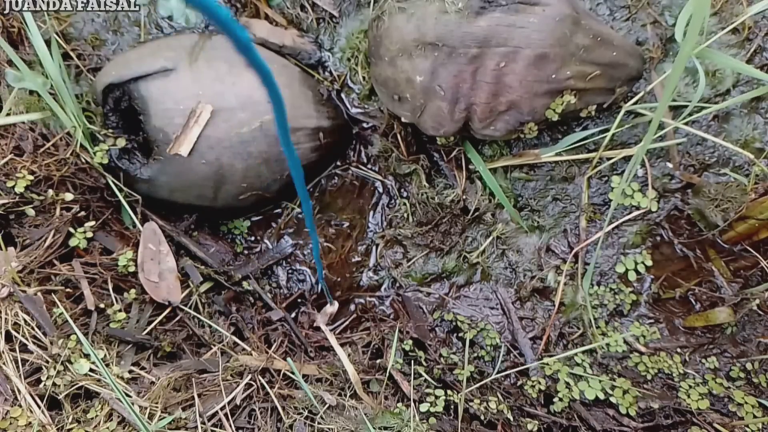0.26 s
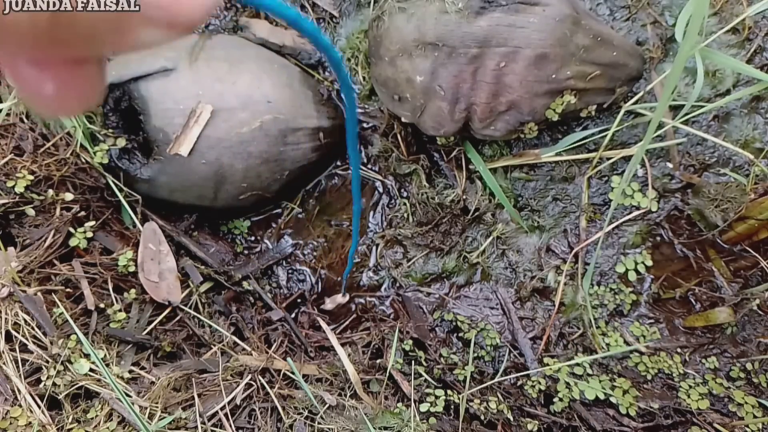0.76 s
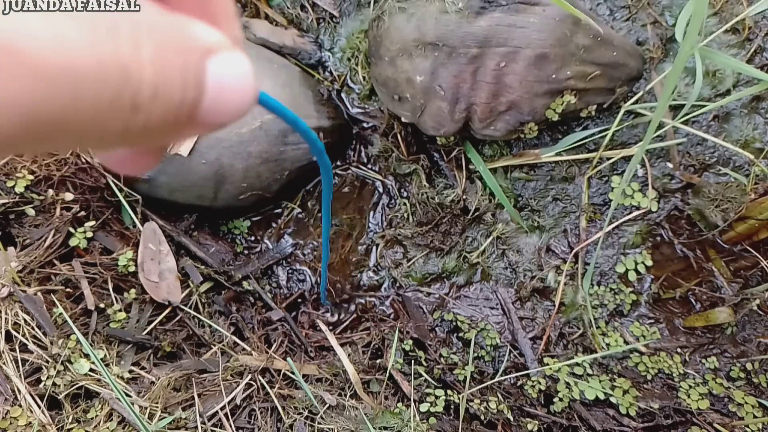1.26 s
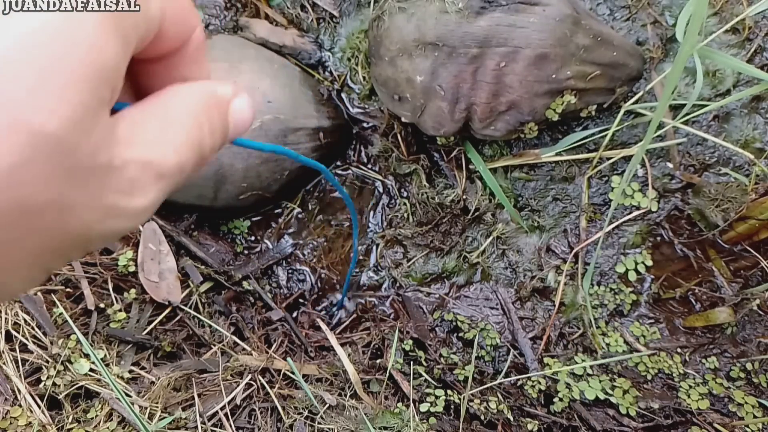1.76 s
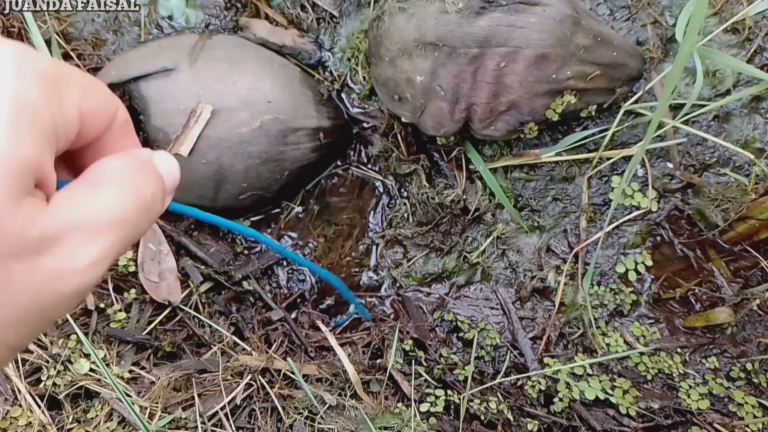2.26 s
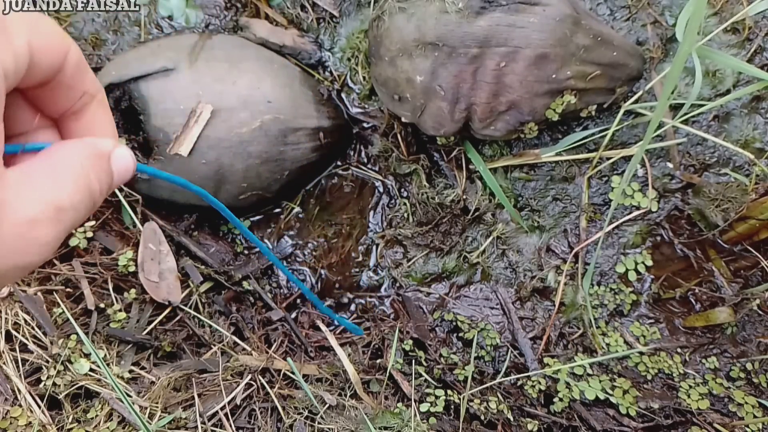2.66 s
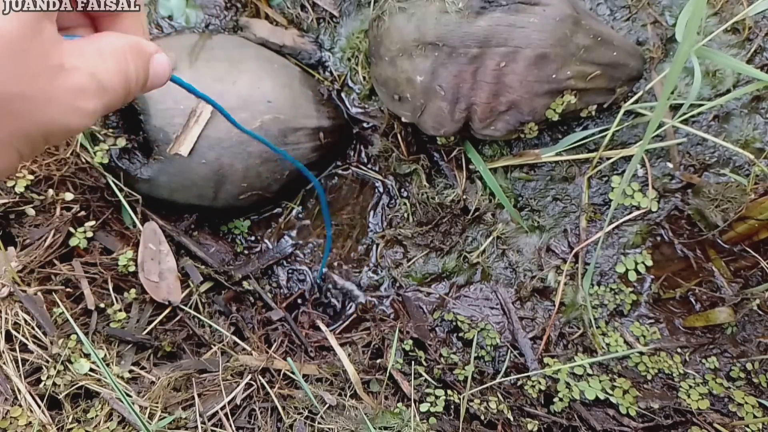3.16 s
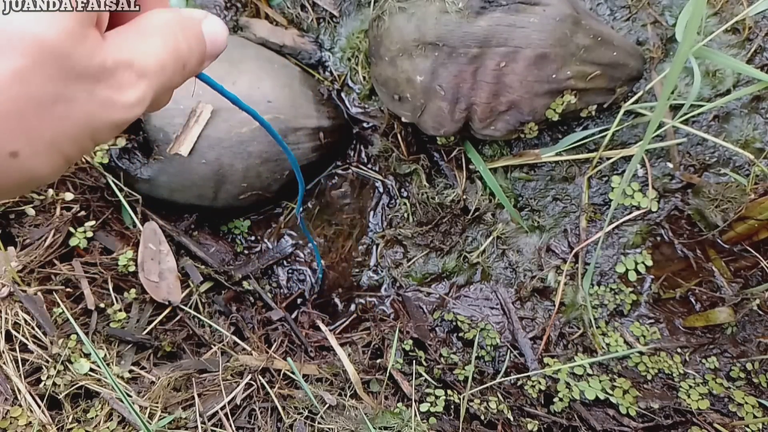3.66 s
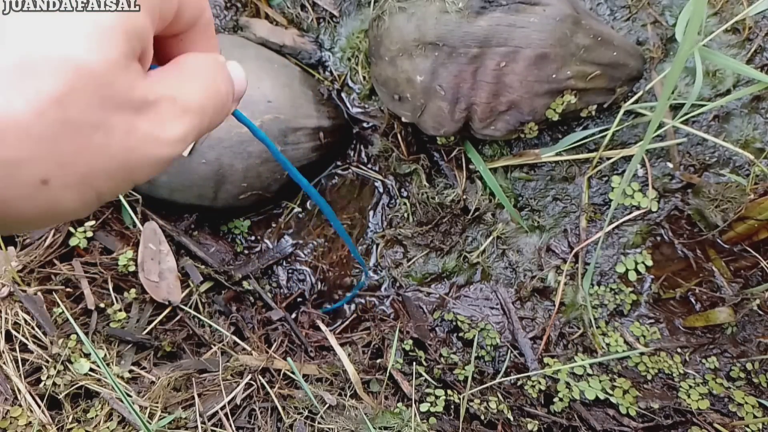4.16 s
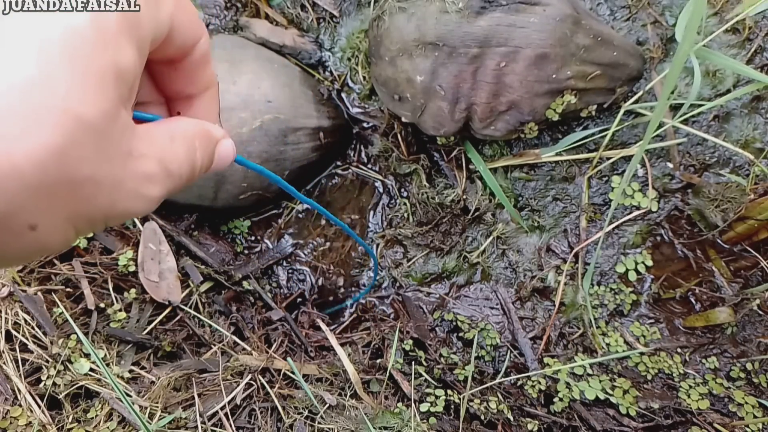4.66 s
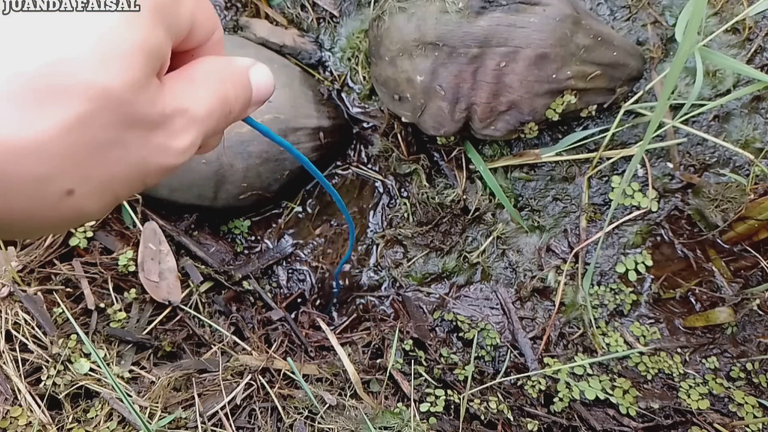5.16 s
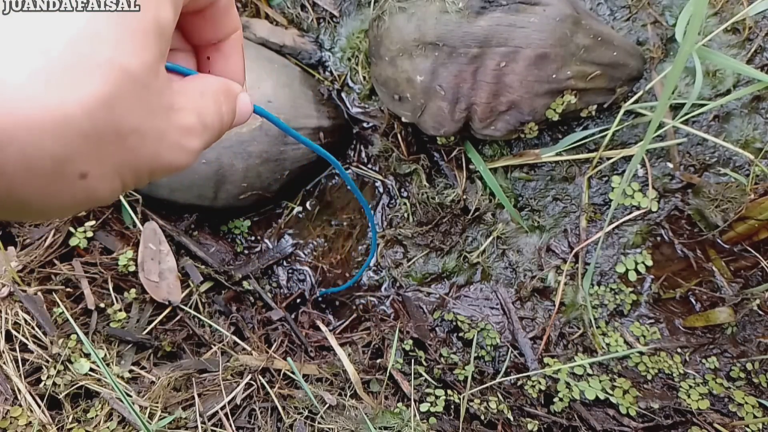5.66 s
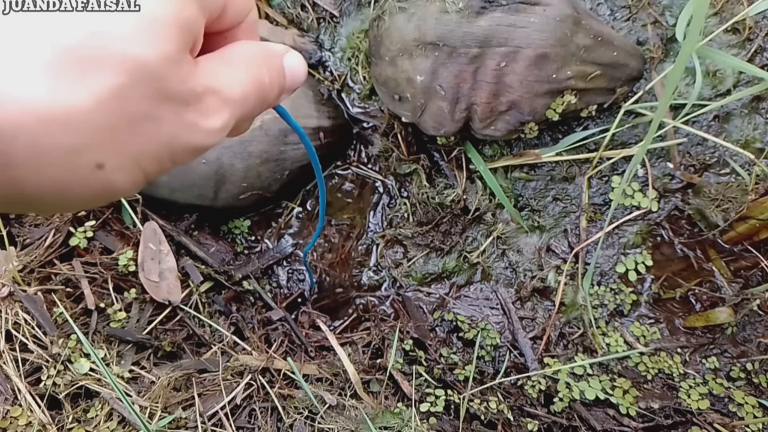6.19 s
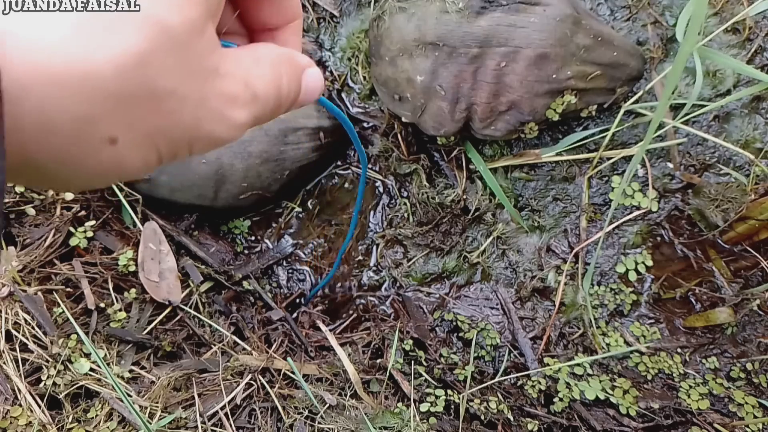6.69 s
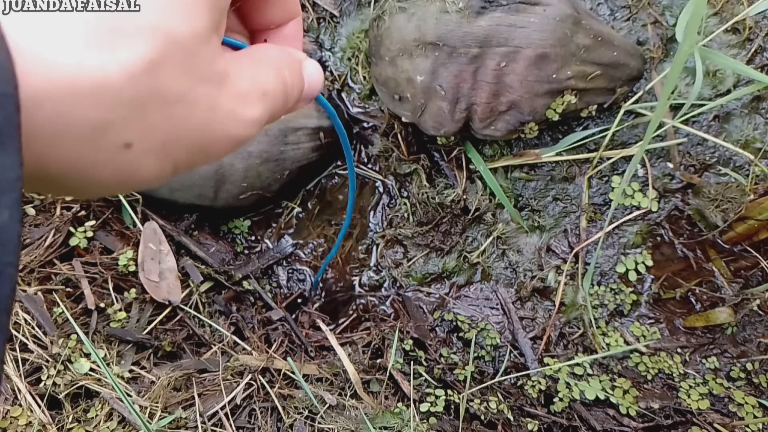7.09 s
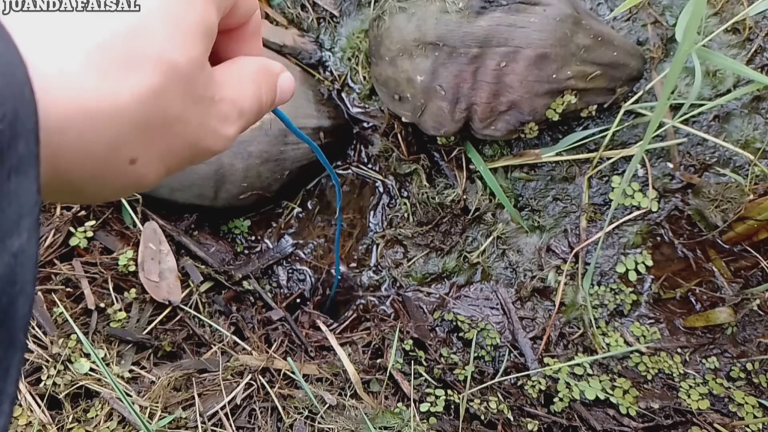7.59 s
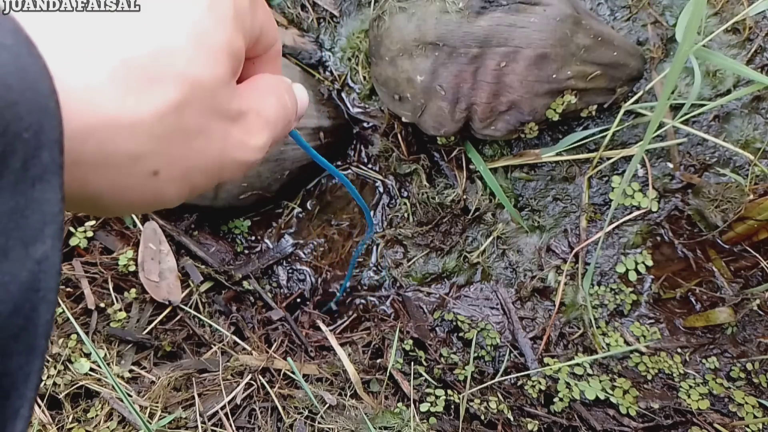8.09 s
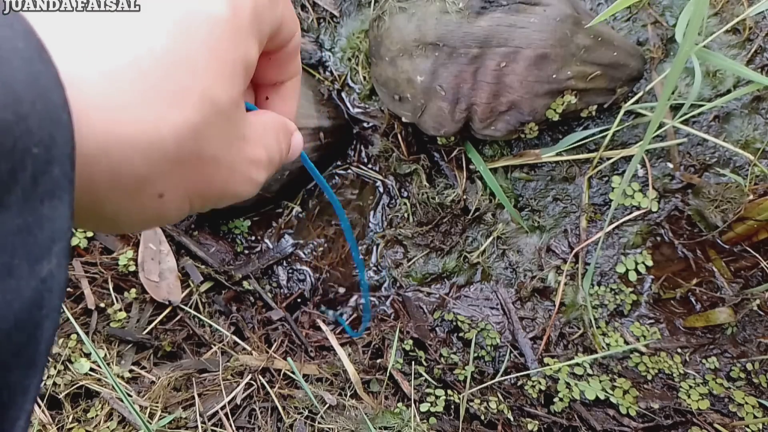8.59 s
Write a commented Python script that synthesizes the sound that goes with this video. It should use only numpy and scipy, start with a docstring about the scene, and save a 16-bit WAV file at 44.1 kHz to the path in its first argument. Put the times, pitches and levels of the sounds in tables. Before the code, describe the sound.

After a tiny silence of 0.1 s, a wide steady outdoor hiss starts, like distant water and leaves, and continues to the end near 8.8 s. It swells slightly around 1.7-3.3 s and near 5.9 s, then eases off. One thin cricket at about 9.2 kHz chirps quickly throughout, roughly ten short buzzing chirps a second; a second, near 9.6 kHz, joins at the very start, from 2.3 to 5.8 s, and more faintly from 7.4 s. Faint wet ticks patter close by, with clearer ones near 1, 1.3, 3, 6 and 7-7.7 s. Small dry rustles brush at 0.9, 1.4-1.7, 3 and 7-7.6 s. Low lumpy wind rumbles quietly beneath. Soft, deep microphone bumps come at 4.4 s, the strongest, and 6.5 s, with a duller knock; others are barely noticeable.

```python
"""A damp open field: a broad steady hiss of far water and leaves, random spectra with slow swells.
Two crickets chirp near 9.2 and 9.6 kHz, each wing stroke a short falling tone.
Lumpy wind is low noise with gusts; soft wind bumps at the microphone are a low push and a higher thud.
Faint wet ticks (decaying sines with splatter) and dry rustles (bright noise bursts) sound close by."""
import sys
import numpy as np
from scipy import signal
from scipy.fft import rfft, irfft
from scipy.io import wavfile
from scipy.ndimage import uniform_filter1d

SR = 44100
rng = np.random.default_rng(int(sys.argv[2]) if len(sys.argv) > 2 else 0)


def dump(signal):
    """Clip the signal to [-1, 1] and save it as 16-bit WAV at the path in sys.argv[1]."""
    limited = np.clip(np.atleast_2d(signal).T, -1, 1)
    pcm = np.round(limited * 32767).astype(np.int16)
    wavfile.write(sys.argv[1], SR, pcm)


def volts_from_decibels(level):
    """Turn decibel levels (scalar or array-like) into linear amplitude factors."""
    exponent = np.asarray(level, float) / 20
    return 10 ** exponent


N = 389844


def evened(x):
    """Scales to rms 1."""
    return x / np.sqrt(np.mean(x ** 2) + 1e-20)


def read(points, hz):
    """Reads a spectrum on a log-frequency axis."""
    f, value = np.transpose(points)
    return np.interp(np.log(hz + 1), np.log(f + 1), value)


def add(mix, s, sound):
    """Adds a sound at a time."""
    part = mix[round(s * SR):][:len(sound)]
    part += sound[:len(part)]


def noise(colour, size, patch_db, flicker_db, lift_db=0):
    """Random short-time spectra with drifting patches and a flicker shared by all bands; rms 1."""
    frames, hz = 4 * N // size + 5, np.fft.rfftfreq(size, 1 / SR)
    real, imag, patches = rng.standard_normal((frames, len(hz), 3)).T
    patches = uniform_filter1d(patches, size=8, axis=0)
    patches = evened(uniform_filter1d(patches, size=12, axis=1))
    flicker = evened(uniform_filter1d(rng.standard_normal(frames), size=3))
    field_db = read(colour, hz)[:, None] + patch_db * patches + flicker_db * flicker + lift_db
    spectra = (real + 1j * imag) * volts_from_decibels(field_db)
    return evened(signal.istft(spectra, nperseg=size, noverlap=size * 3 // 4)[1][:N])


# hiss spectrum: (frequency [Hz], relative density [dB per Hz])
HISS_COLOUR = [(120, -22.5), (200, -7), (330, -0.5), (500, -3), (1200, -3), (1700, -1), (3000, -1),
               (3700, -2), (4650, -6), (4900, -7.5), (7600, -19.5), (8500, -15), (10500, -17),
               (12700, -32.5), (15500, -22)]
# hiss swell, before the fixed gain: (time [s], level [dB])
HISS_SWELL = [(.12, -38.5), (.6, -38), (1.2, -38), (1.75, -36.5), (2, -38), (2.3, -36.5), (2.7, -37),
              (2.97, -37.5), (3.23, -36.5), (3.4, -39), (4.6, -38.3), (5.7, -38), (5.9, -36.8),
              (6.3, -37.5), (7, -37.6), (7.4, -38), (8, -38.5), (8.84, -39.5)]
TREBLE_LIFT_DB, TREBLE_DB_PER_SWELL_DB = -0.5, 0.7


def hiss():
    """Wide wash; its bass follows the swells only in part, above 6 kHz it swells progressively more."""
    s, level_db = np.transpose(HISS_SWELL)
    hz = np.fft.rfftfreq(1024, 1 / SR)[:, None]
    t = np.arange(4 * N // 1024 + 5) * 256 / SR
    follows = np.clip(0.13 + hz / 2500, 0, 1)
    treble = np.clip(hz / 4000 - 1.5, 0, 1)
    swell_db = np.interp(t, s, level_db - level_db.mean())
    lift_db = follows * swell_db + treble * (TREBLE_LIFT_DB + TREBLE_DB_PER_SWELL_DB * swell_db)
    wash = noise(HISS_COLOUR, size=1024, patch_db=0.73, flicker_db=0.77, lift_db=lift_db)
    return volts_from_decibels(level_db.mean() + 0.8) * wash


# wind on the microphone, before the fixed gain: (time [s], level [dB])
WIND_GUSTS = [(.12, -53), (.3, -56), (.73, -60), (1, -57), (1.7, -61), (2.3, -60), (2.65, -55), (2.95, -57),
              (3.2, -52), (3.4, -58), (4.2, -60.5), (4.5, -56), (5.05, -62), (5.7, -62), (6.3, -58),
              (6.6, -55), (6.9, -63), (7.3, -60), (7.7, -59), (8.84, -60)]
# wind spectrum: (frequency [Hz], relative density [dB])
WIND_SPECTRUM = [(18, -40), (30, -27), (42, -4), (60, -2), (85, -1), (128, -3.5), (170, -20), (300, -54)]
GUST_DEEP_HZ = 95  # gusts act fully below, about half as much an octave above


def wind():
    """Lumpy low turbulence; gusts are felt most in the deep bass."""
    s, level_db = np.transpose(WIND_GUSTS)
    hz = np.fft.rfftfreq(4096, 1 / SR)[:, None]
    t = np.arange(4 * N // 4096 + 5) * 1024 / SR
    gust_db = np.interp(t, s, level_db - level_db.mean()) * np.minimum(1, GUST_DEEP_HZ / (hz + 1))
    rumble = noise(WIND_SPECTRUM, size=4096, patch_db=0.1, flicker_db=1.0, lift_db=gust_db)
    return volts_from_decibels(level_db.mean() - 0.65) * rumble


# small wet ticks: (time [s], level of the sine before its envelope [dB], pitch [Hz])
CLEAR_TICKS = [(0.972, -24, 3620), (1.245, -27, 1690), (1.3354, -24.5, 3420), (1.6836, -28, 2590),
               (1.7177, -26.5, 2480), (2.5885, -28, 2570), (2.895, -25.5, 2990), (2.96, -26, 2880),
               (3.1063, -27, 1630), (3.208, -25, 2640), (5.0804, -29, 2650), (6.035, -23.5, 1790),
               (6.1594, -25, 2450), (7.006, -26, 2410), (7.0589, -29, 1610), (7.239, -26, 2520),
               (7.5193, -26, 2530), (7.677, -29, 4500)]
TICK_T60_S, DROP_T60_S, DROPS_PER_S = 0.024, 0.0082, 30  # drops: mean rate per pitch at mean swell


def ticks():
    """A few cycles with a wet splatter; the clearest are listed, fainter ones fall at random."""
    out, t = np.zeros(N), np.arange(900) / SR
    wet = signal.butter(2, [1400, 4500], "band", fs=SR)
    for (s, db, hz), spray in zip(CLEAR_TICKS, rng.standard_normal((len(CLEAR_TICKS), len(t)))):
        splatter = evened(signal.lfilter(*wet, spray))
        envelope = volts_from_decibels(db - 60 * t / TICK_T60_S) * np.minimum(t / 0.0019, 1)
        add(out, s, envelope * (np.sin(2 * np.pi * hz * t) + 0.73 * splatter))
    s, swell_db = np.transpose(HISS_SWELL)
    busy = volts_from_decibels(3 * (np.interp(np.arange(N) / SR, s, swell_db) - swell_db.mean()))  # more in the swells
    drop_envelope = volts_from_decibels(-60 * t / DROP_T60_S) * np.minimum(t / 0.0012, 1)
    for hz in np.geomspace(1200, 4500, num=8):
        falls = rng.random(N) < DROPS_PER_S * busy / SR
        drops = falls * volts_from_decibels(-42.5 + 3.9 * np.minimum(rng.exponential(1, N), 4))
        out += signal.oaconvolve(drops, drop_envelope * np.sin(2 * np.pi * hz * t))[:N]
    return out


CHIRPS_PER_ROW = 4
SLIP_S, UNEVEN_DB, UNEVEN_SHARE = .0015, .5, .03  # chirp-to-chirp scatter: start, level, sung share
DRIFT_HZ = 22  # chirp-to-chirp scatter in pitch


def fill_chirps(bouts):
    """Fills in evenly spaced chirps between rows: (start [s], length [s], level [dB])."""
    out = []
    for rows in bouts:
        place = np.arange((len(rows) - 1) * CHIRPS_PER_ROW + 1) / CHIRPS_PER_ROW
        s, db, share = (np.interp(place, np.arange(len(rows)), column) for column in np.transpose(rows))
        slip, loud, long = rng.standard_normal((len(s), 3)).T
        length = np.gradient(s) * np.clip(share + UNEVEN_SHARE * long, .3, 1.1)
        out += zip(s + SLIP_S * slip, length, db + UNEVEN_DB * loud)
    return [chirp for chirp in out if 0 <= chirp[0] < N / SR]


def cricket(chirps, pitch_curve, strokes_per_s, fall_hz, rise_hz, swell_db, wing_hz):
    """Each wing stroke is a short tone falling in pitch, loudest near the wing resonance."""
    out, lag = np.zeros(N), np.arange(4000) / SR
    # diffuse echoes, perhaps off grass, drawn at random for each chirp
    diffuse = rng.standard_normal((len(chirps), len(lag))) * volts_from_decibels(-60 * lag / 0.24)
    for (s, length, db), chance, echoes in zip(chirps, rng.standard_normal((len(chirps), 24)), diffuse):
        t = np.arange(round(length * SR)) / SR
        turns, along = t * strokes_per_s * (1 + 0.018 * chance[-1]), t / length
        stroke, uneven = turns % 1, chance[turns.astype(int) % 22]
        # strokes widen in pitch, rise and grow through a chirp
        fall = fall_hz * (0.94 + 0.75 * along) * (1 - 2 * stroke)
        off_hz = rise_hz * (along - .5) + fall + 40 * uneven
        pitch_hz = np.interp(s, *np.transpose(pitch_curve)) + DRIFT_HZ * chance[-2] + off_hz
        resonance = np.exp(-(off_hz / wing_hz) ** 2)
        closing = np.sin(np.pi * np.clip(stroke / 0.92, 0, 1)) * resonance
        carrier = np.sin(2 * np.pi * np.cumsum(pitch_hz) / SR)
        tone = carrier * closing * volts_from_decibels(swell_db * along + 1.3 * uneven)
        chirp = volts_from_decibels(db) * evened(tone) * signal.windows.tukey(len(t), .1)
        add(out, s, chirp)
        add(out, s, volts_from_decibels(-6) * signal.fftconvolve(chirp, echoes / np.linalg.norm(echoes)))
    return out


# every fourth chirp, one list per bout: (time [s], level [dB], sung share of the period [1])
LOW_BOUTS = [
    [(.059, -42.5, 0.68), (.449, -47, 0.81), (.836, -42, 0.79), (1.232, -43.3, 0.77), (1.63, -42.5, 0.84),
     (2.025, -40, 0.79), (2.442, -43, 0.68), (2.865, -45.5, 0.91), (3.298, -43.5, 0.85), (3.707, -44, 1),
     (4.122, -42, .75), (4.535, -43, 0.78), (4.955, -44.5, 0.78), (5.38, -44.5, 0.83), (5.812, -42.5, 0.77),
     (6.245, -42, 0.81), (6.685, -41, 0.72), (7.099, -47.5, 0.8), (7.483, -46.5, 0.74),
     (7.855, -45.5, 0.95), (8.24, -43.5, 0.79), (8.636, -47, .85), (9.01, -46, .8)],
]
# centre pitch before scatter: (time [s], pitch [Hz])
LOW_PITCH_CURVE = [(0, 9280), (1, 9210), (2.099, 9350), (3, 9230), (4, 9210), (5, 9100), (6.3, 9335),
                   (7.2, 9200), (8.84, 9160)]


def low_cricket():
    """Lower singer: broad wing resonance, deep fall in each stroke."""
    return cricket(fill_chirps(LOW_BOUTS), LOW_PITCH_CURVE, strokes_per_s=140, fall_hz=460,
                   rise_hz=141, swell_db=3.3, wing_hz=1700)


# every fourth chirp, one list per bout: (time [s], level [dB], sung share of the period [1])
HIGH_BOUTS = [
    [(-.298, -42, 0.91), (.142, -40.5, 0.53)],
    [(2.23, -60, 0.65), (2.655, -44.5, 0.73), (3.082, -47.5, 0.94), (3.53, -42.5, 0.73),
     (3.958, -40.5, .74), (4.395, -39, 0.75), (4.845, -38.5, 0.75), (5.275, -39, 0.79), (5.75, -41, .8)],
    [(7.42, -53, 0.87), (7.862, -48, .85), (8.33, -47.5, .78), (8.765, -44.5, 0.69)],
]
# centre pitch before scatter: (time [s], pitch [Hz])
HIGH_PITCH_CURVE = [(0, 9600), (2.4, 9590), (4, 9630), (5.9, 9570), (7.4, 9630), (8.84, 9580)]


def high_cricket():
    """Higher singer: narrower wing resonance, shallower fall, stronger swell."""
    return cricket(fill_chirps(HIGH_BOUTS), HIGH_PITCH_CURVE, strokes_per_s=141, fall_hz=325,
                   rise_hz=42, swell_db=5.3, wing_hz=520)


# dry rustles: (time [s], level before the high-pass [dB], t60 [s])
RUSTLE_BURSTS = [(.255, -52, .04), (.922, -51, .04), (.939, -44, .07), (1.417, -52, .08), (1.549, -51, .08),
                 (1.737, -51, .06), (2.965, -50, .2), (6.971, -49, .08), (7.05, -53, .15),
                 (7.558, -44, .03)]


def rustles():
    """Short decaying bursts of bright noise."""
    out, t = np.zeros(N), np.arange(SR // 4) / SR
    bright = signal.butter(1, 5000, "high", fs=SR, output="sos")
    for (s, db, t60), grit in zip(RUSTLE_BURSTS, rng.standard_normal((len(RUSTLE_BURSTS), len(t)))):
        burst = volts_from_decibels(db - 60 * t / t60) * np.minimum(t / .002, 1)
        add(out, s, burst * signal.sosfilt(bright, grit))
    return out


# soft wind bumps at the microphone:
# (centre time [s], push level [dB], push pitch [Hz], push length scale [s], thud level re push [dB])
WIND_BUMPS = [(.28, -46, 71, .04, -20), (0.611, -46, 85, .03, -11), (1.021, -40, 80, 0.026, -10),
              (2.97, -42, 75.8, 0.08, -22), (3.07, -42, 65, .04, -17), (3.635, -38, 90, 0.019, -20),
              (4.418, -23.5, 80, 0.035, -16), (4.474, -37, 90, 0.021, -20), (4.556, -42, 80, 0.055, -18),
              (6.499, -27.5, 80, 0.02, -7.5), (6.533, -39, 90, .03, -14), (6.565, -38, 85, .04, -1),
              (6.733, -46, 80, .06, -20), (8.714, -45, 70, 0.05, -18)]
THUD_HZ = 256


def wind_bumps():
    """A low push of one to a few cycles, swelling and dying away, and a shorter, higher thud."""
    out, t = np.zeros(N), np.arange(-SR // 10, SR // 10) / SR
    for s, db, hz, length, thud_db in WIND_BUMPS:
        push = np.cos(2 * np.pi * hz * t + 0.53) * (1 + (3 * t / length) ** 2) ** -1.8
        thud = volts_from_decibels(thud_db) * -np.cos(2 * np.pi * THUD_HZ * t) * np.exp(-(t / 0.0062) ** 2)
        add(out, s + t[0], volts_from_decibels(db) * (push + thud))
    return out


def scene():
    """Everything at one microphone."""
    insects = low_cricket() + high_cricket()
    return (hiss() + wind() + ticks() + insects + rustles() + wind_bumps())[None]


def band_limit(x):
    """A steep low-pass at the top of the band."""
    return signal.sosfilt(signal.butter(12, 16650, fs=SR, output="sos"), x)


NOTCH_HZ, NOTCH_WIDTH_HZ, NOTCH_DB = 166, 19.5, -12
BASS_CUT_HZ, EDGE_HZ = 27.6, 15510  # -6 dB point; nothing above the edge
START_S = .1075


def record(dry):
    """A narrow dip where the bass and main paths cross, band limits, a short silence at first."""
    hz = np.fft.rfftfreq(N, 1 / SR)
    dip = volts_from_decibels(NOTCH_DB * np.exp(-((hz - NOTCH_HZ) / NOTCH_WIDTH_HZ) ** 2))
    bass_cut = 1 / (1 + (BASS_CUT_HZ / (hz + 1)) ** 4)
    treble_edge = np.clip((EDGE_HZ - hz) / 60, 0, 1)
    coloured = irfft(rfft(dry) * dip * bass_cut * treble_edge, N)
    opening = np.clip((np.arange(N) / SR - START_S) / 0.00027, 0, 1)
    return band_limit(coloured * opening)


dry = scene()
out = record(dry)
dump(out)
```